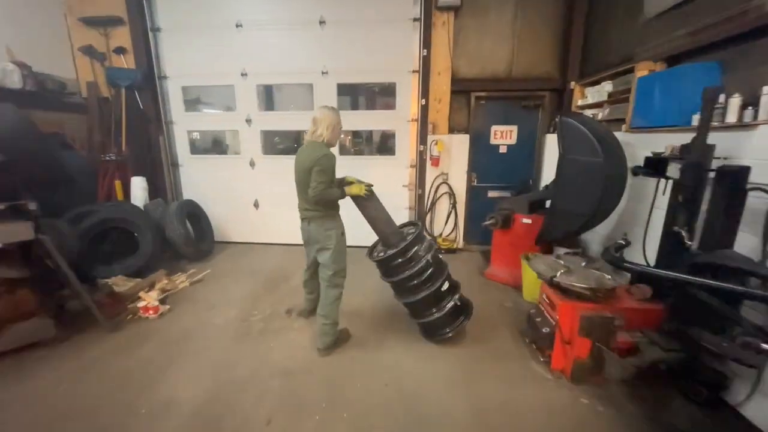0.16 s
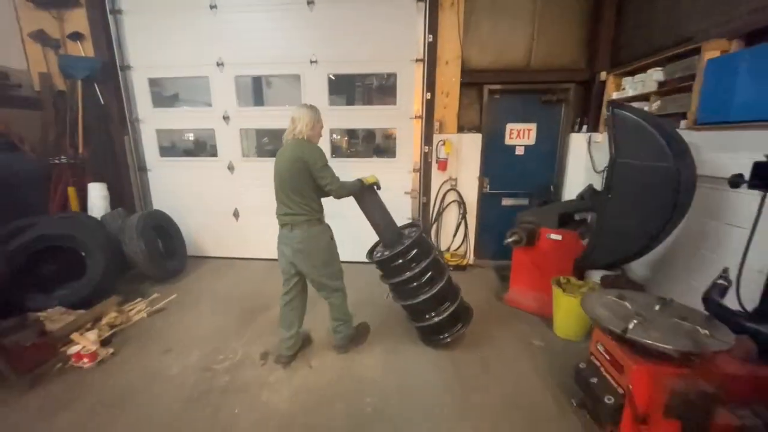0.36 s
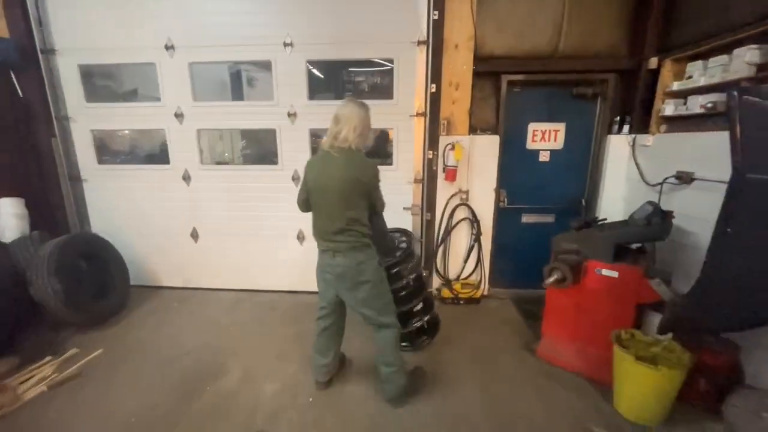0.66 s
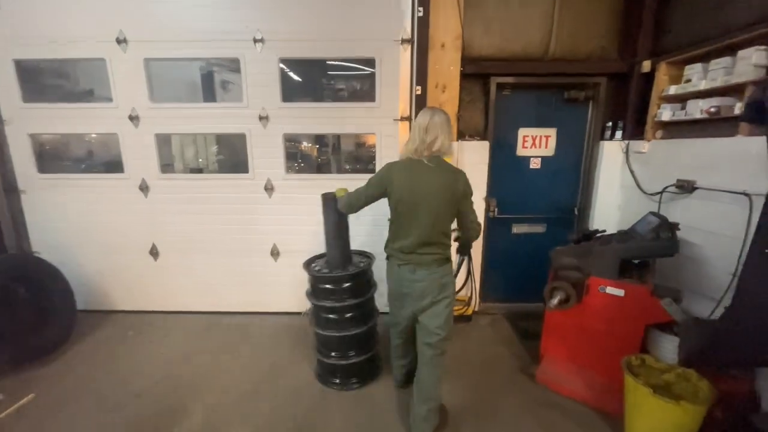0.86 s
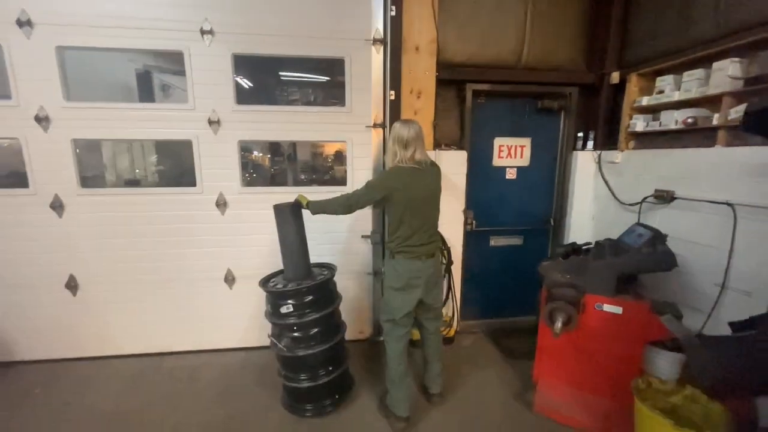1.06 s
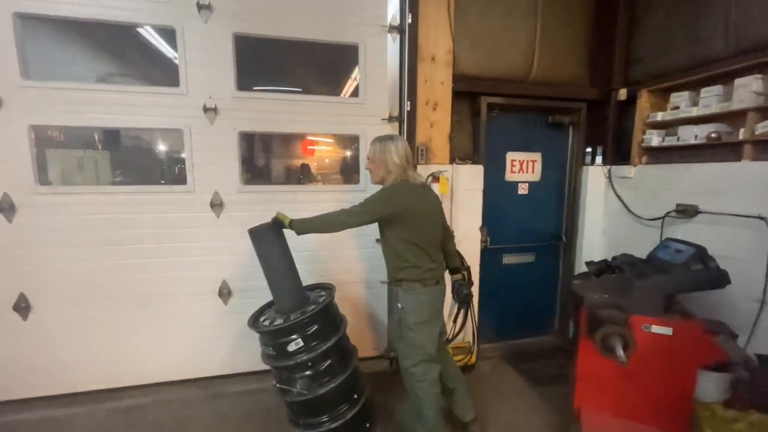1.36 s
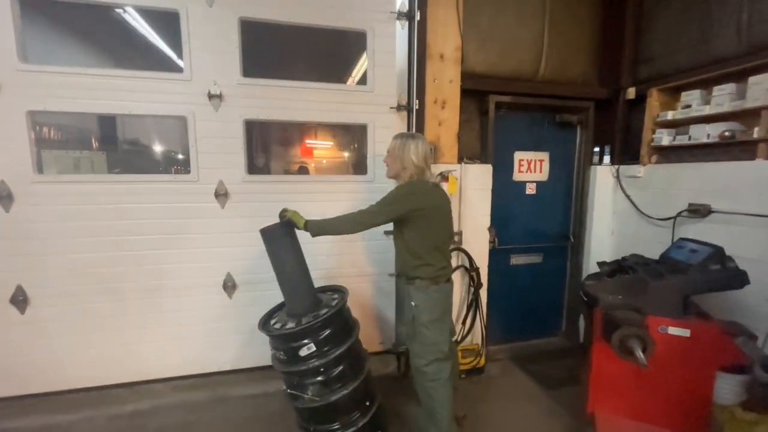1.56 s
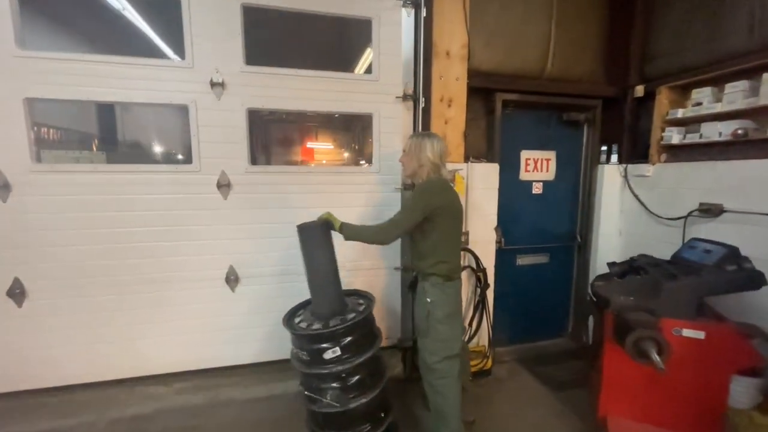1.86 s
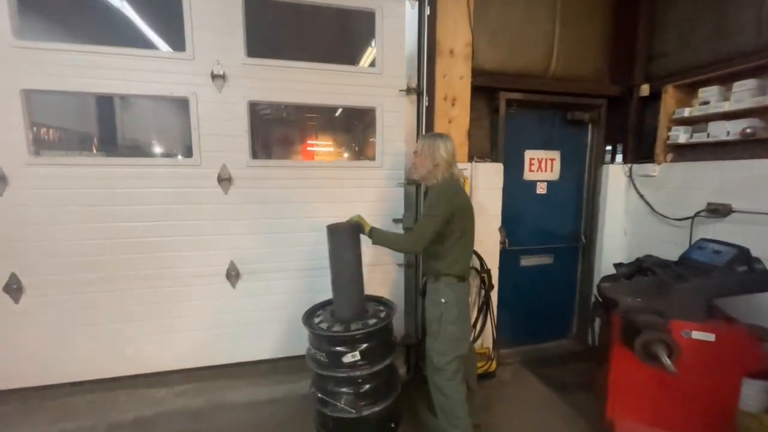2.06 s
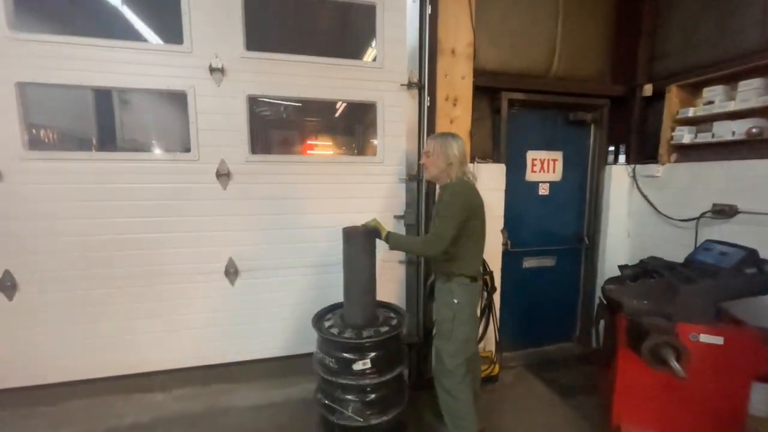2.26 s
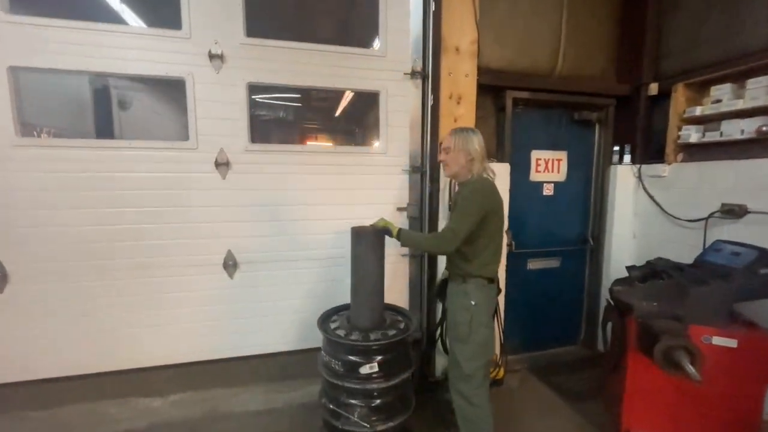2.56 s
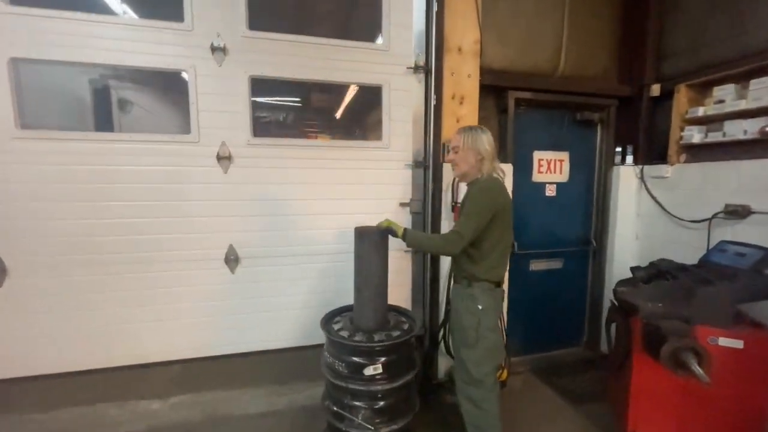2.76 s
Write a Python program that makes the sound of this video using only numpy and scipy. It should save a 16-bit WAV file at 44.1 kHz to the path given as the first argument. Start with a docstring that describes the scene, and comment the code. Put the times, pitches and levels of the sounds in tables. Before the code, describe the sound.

In a workshop, a steel stove is walked on its rim with gritty scrapes and a low rumble, then set down. An electric opener hums and its chain hisses until sheet metal door panels rattle hard. Mono, slightly dull top.

```python
"""Workshop: a heavy steel stove is walked on its rim over concrete: low rumble, gritty scuffs, a thud as it is set down.
Then a door opener starts with a clack, hums and jingles its chain; the sheet metal door jolts and rattles as it lifts.
Rumble, hum and boom are notes wandering in phase; scuffs, jolts and clack are bursts of gritty noise.
Scuffs and jolts also strike modes of steel; chance ticks ring the chain.
Lone tones, short bright noise bursts, mostly on top of scuffs and jolts, and a murmur complete it."""
import sys
import numpy as np
from scipy import signal
from scipy.fft import rfft, irfft
from scipy.io import wavfile
from scipy.ndimage import uniform_filter1d

SR = 44100
rng = np.random.default_rng(int(sys.argv[2]) if len(sys.argv) > 2 else 0)


def bounce(signal):
    """Save signal as a 16-bit WAV file at the path given by the first command-line argument."""
    frames = np.transpose(np.atleast_2d(signal))
    limited = np.clip(frames, -1, 1)
    pcm = np.round(limited * 32767).astype(np.int16)
    wavfile.write(sys.argv[1], SR, pcm)


N = 127890
CLACK_S = 1.208  # the opener starts


def rolling():
    """The rim drums the hollow body at a low note that slides as it leans."""
    # rumble: [t/s, level/dB, f/Hz]
    roll = [(0.015, -32, 136), (0.05, -50.5, 140.7), (0.132, -42, 129.5), (.3, -43, 145.8),
            (.36, -40.5, 103.3), (0.454, -47, 109), (0.482, -34, 125.2), (.545, -38, 149.3),
            (.575, -43.5, 144), (0.62, -34.5, 136.4), (0.67, -58, 123.5), (0.876, -64, 124.1),
            (0.916, -29.5, 118.5), (0.964, -47, 121.3), (1.2, -57, 108.6)]
    width_hz, fade_s = 28, roll[0][0]
    t = np.arange(N) / SR
    fade = np.clip(np.minimum(t, roll[-1][0] - t) / fade_s, 0, 1)
    note = wavering(curve(roll, column=2), width_hz, steady_s=0.0386)
    return amp(curve(roll, column=1)) * note * fade


def scuffs():
    """Rim and boots scuff and knock on concrete: gritty bursts that ring the steel body."""
    # scuffs and knocks: [start/s, level/dB, rise/s, t60/s, treble tilt/(dB/octave)]
    scuff_rows = [(0.0, -46.5, 0.0015, 1, -2.5), (.082, -41, 0.0055, 0.44, -1),
                  (.222, -48, 0.008, 0.8, -0.5), (.28, -45.5, 0.021, 1, -2), (.32, -32, 0.033, 0.16, 0),
                  (.436, -41, .012, 0.28, 0.5), (.468, -42, 0.015, 0.088, -0.5),
                  (.52, -41, 0.014, 0.25, 0.5), (.652, -49, 0.0052, 0.21, 7),
                  (.885, -26.5, 0.036, 0.18, 0.5), (1.0, -47, 0.03, 0.1, -2),
                  (1.045, -48, 0.0046, 0.074, 3.5)]
    # spectrum of the grit: [f/Hz, density/(dB per Hz)]
    grit = [(35, -42), (60, -25), (123, -6.5), (289, -12), (491, -8), (1080, -9.5), (1520, -11.5),
            (5180, -20.5), (10900, -29), (15000, -57)]
    # modes of the stove: [f/Hz, width/Hz, level/dB]
    stove_modes = [(228.8, 16, 5), (360, 26, 2), (488.7, 24, 6), (574, 17, -14), (872, 9.7, 3),
                   (1060, 12, -11), (1480, 11, -3), (1830, 5, -10), (2340, 13, -2), (2580, 12, -5),
                   (3210, 22, 1), (5470, 42, -8)]
    return blows(scuff_rows, grit, stove_modes, body_db=-6, spread_db=-1.5)


def jolts():
    """The door panels jolt: rattling bursts that ring the sheet metal."""
    # jolts: [start/s, level/dB, rise/s, t60/s, treble tilt/(dB/octave)]
    jolt_rows = [(2.382, -25.5, 0.0083, 1, 0), (2.42, -23, 0.015, 0.72, 0), (2.465, -26, 0.0062, 1, 1),
                 (2.51, -18.5, 0.012, 0.38, 0.5), (2.58, -31.5, 0.015, 0.43, -3.5),
                 (2.635, -26, 0.017, 0.81, -2), (2.745, -30, 0.006, 0.12, -3.5),
                 (2.8, -34.5, 0.017, 0.45, -1.5)]
    # spectrum of the rattle: [f/Hz, density/(dB per Hz)]
    rattle = [(35, -46), (60, -23), (112, -9), (317, -16.5), (577, -13.5), (633, -13), (938, -12.5),
              (5180, -24.5), (7330, -27.5), (10600, -29.5), (15000, -65)]
    # modes of the panels: [f/Hz, width/Hz, level/dB]
    panel_modes = [(254.7, 7.4, -2.5), (459.6, 6.9, -3), (510, 3.5, -6.5), (718, 4.5, -3.5),
                   (847, 4.3, -2.5), (1094, 8, -7.5), (1474, 7.6, -3), (1786, 7.4, -14), (2029, 5.6, -5),
                   (2269, 3.6, -6.5), (2580, 6.2, -11), (4790, 9.4, -6.5), (5120, 7.4, -6.5),
                   (10550, 100, -2.5)]
    return blows(jolt_rows, rattle, panel_modes, body_db=-2, spread_db=2)


def boom():
    """The whole door booms at its lowest note."""
    # boom: [t/s, level/dB]
    boom_level = [(2.38, -32), (2.472, -20), (2.6, -42.5), (2.656, -24.5), (2.708, -35.5), (2.846, -32),
                  (2.9, -36)]
    hz, width_hz, fade_in_s = 109.5, 7.2, 0.039
    fade = np.clip((np.arange(N) / SR - boom_level[0][0]) / fade_in_s, 0, 1)
    return amp(curve(boom_level, column=1)) * wavering(hz, width_hz, steady_s=0.14) * fade


def singing():
    """One part of the door sings a narrow note through the jolts."""
    # singing part: [t/s, level/dB]
    sing_level = [(2.4, -52), (2.44, -29), (2.6, -29.5), (2.72, -39.5), (2.78, -43)]
    hz, width_hz, fade_s = 628, 4.2, 0.017
    t = np.arange(N) / SR
    fade = np.clip(np.minimum(t - sing_level[0][0], sing_level[-1][0] - t) / fade_s, 0, 1)
    return amp(curve(sing_level, column=1)) * wavering(hz, width_hz, steady_s=0.022) * fade


def opener():
    """Motor, chain and gears each follow a level curve once the opener has started."""
    # opener running: [t/s, hum level/dB, chain level/dB]
    running = [(1.27, -40, -56), (1.39, -39, -47.5), (1.45, -35.5, -46.5), (1.51, -33, -39.5),
               (1.66, -34, -42), (1.8, -32.5, -39.5), (2.02, -34, -40.5), (2.37, -32.5, -42),
               (2.9, -41, -43)]
    # roar of the gears: [t/s, level/dB]
    roar_level = [(1.27, -42), (1.4, -47), (1.44, -46), (1.49, -41), (2.1, -42), (2.25, -43.5), (2.37, -41),
                  (2.9, -41)]
    spin_up_s = 0.05
    on = np.clip((np.arange(N) / SR - CLACK_S) / spin_up_s, 0, 1)
    hum = amp(curve(running, column=1)) * motor_hum()
    chain_and_whine = amp(curve(running, column=2)) * (chain() + whine())
    roar = amp(curve(roar_level, column=1)) * gear_roar()
    return on * (hum + chain_and_whine + roar)


def motor_hum():
    """The motor hums on several low notes, each wandering in phase."""
    # notes: [f/Hz, width/Hz, level/dB]
    hum_notes = [(72.6, 14, -4.5), (117.2, 6.6, 0.5), (146.5, 23, -6), (185, 40, -10), (49.8, 33, -19)]
    return evened(sum(amp(db) * wavering(hz, width, steady_s=0.15) for hz, width, db in hum_notes))


def gear_roar():
    """The gears roar: coloured noise, with resonances driven by the same noise."""
    # spectrum of the roar: [f/Hz, density/(dB per Hz)]
    roar_spectrum = [(25, -14), (123, -13), (313, -25), (391, -20.5), (665, -26.5), (1010, -33),
                     (1510, -32), (2870, -35), (4280, -45.5), (5000, -37), (6500, -77)]
    # resonances: [f/Hz, width/Hz, level/dB]
    roar_rings = [(383, 11, -17), (980, 200, -5), (2846, 12, -21)]
    noise = gritty(N, spread_db=0.5)
    high_pass = signal.butter(2, 200, "high", fs=SR)
    roar = evened(signal.lfilter(*high_pass, coloured(noise, roar_spectrum, lump_db=3.0)))
    return roar + sum(amp(db) * evened(resonate(noise, hz, width)) for hz, width, db in roar_rings)


def whine():
    """A thin high note of the gears fades in, then comes and goes."""
    hz, width_hz, level_db = 4540, 30, -14.5
    start_s, rise_s = 1.3, 0.2
    fade = np.clip((np.arange(N) / SR - start_s) / rise_s, 0, 1)
    return amp(level_db) * wavering(hz, width_hz, steady_s=0.053) * wander() * fade


def chain():
    """The chain hisses and jingles, and runs unevenly."""
    # spectrum of the hiss: [f/Hz, density/(dB per Hz)]
    hiss_spectrum = [(2060, -45), (3500, -4.5), (4270, -10), (5280, -3), (6320, -5), (8910, -3),
                     (10800, -4), (11600, 6), (13700, -45), (15500, -38)]
    links_db = 2  # re hiss
    hiss = evened(coloured(gritty(N, spread_db=2.5), hiss_spectrum, lump_db=5.5))
    return evened((hiss + amp(links_db) * chain_links()) * wander(depth_db=1, span_s=0.0079))


def chain_links():
    """Each link mode is ticked at random moments with chance strength."""
    # link modes: [f/Hz, width/Hz, level/dB]
    link_modes = [(5380, 100, -8), (7900, 83, -6), (8430, 45, -6), (9500, 73, -6), (10160, 140, 0),
                  (10730, 63, -1.5), (10780, 84, 1.5), (11100, 78, -5)]
    ticks_per_s, spread_db = 500, 2.5  # per mode
    count = round(ticks_per_s * N / SR)
    out, shake = np.zeros(N), wander()
    for hz, width, db in link_modes:
        when, size = rng.random((2, count))
        ticks = np.zeros(N)
        ticks[(when * N).astype(int)] = amp(-spread_db * np.log(np.maximum(size, 0.02)))
        out += amp(db) * resonate(ticks * shake, hz, width)
    return evened(out)


def clack():
    """The opener engages and settles: bright bursts over a thump whose low note climbs."""
    # clacks: [start/s, level/dB, rise/s, t60/s, treble tilt/(dB/octave)]
    clack_rows = [(1.21, -29, 0.024, 0.14, 0), (1.272, -39.5, 0.017, 0.29, -1.5)]
    # spectrum of the clacks: [f/Hz, density/(dB per Hz)]
    clack_spectrum = [(50, -24), (166, -8), (648, -17), (960, -23), (1630, -18), (2590, -19), (10900, -16),
                      (15000, -48)]
    thump_db, from_hz, to_hz = -32.5, 93, 208
    rise_s, t60_s, glide_s = 0.045, 0.16, 0.03
    out = blows(clack_rows, clack_spectrum, body=None, body_db=0, spread_db=0.64)
    t = np.arange(SR // 4) / SR
    hz = to_hz + (from_hz - to_hz) * np.exp(-t / glide_s)
    thump = swell(t, rise_s, t60_s) * np.sin(2 * np.pi * np.cumsum(hz) / SR)
    add(out, CLACK_S, amp(thump_db) * thump)
    return out


def pings():
    """Short lone tones swell and die."""
    # tones: [start/s, f/Hz, level/dB, rise/s, t60/s]
    ping_rows = [(.175, 507, -41.5, 0.02, 0.15), (.54, 650, -45.5, 0.017, 0.13),
                 (.95, 631, -36.5, 0.0062, 0.14), (1.029, 261.5, -47, 0.013, 0.24),
                 (1.15, 360, -53.5, 0.031, 0.11), (1.222, 654, -42.5, .018, 0.086)]
    out, t = np.zeros(N), np.arange(SR // 2) / SR
    for start, hz, db, rise, t60 in ping_rows:
        tone = np.sin(2 * np.pi * (hz * t + rng.random()))
        add(out, start, amp(db) * swell(t, rise, t60) * tone)
    return out


def bright_bursts():
    """Short bright noise, mostly on top of scuffs and jolts: gritty noise through two equal resonances in a row."""
    # bright band bursts: [start/s, level/dB, rise/s, t60/s, centre f/Hz, width of each resonance/Hz]
    burst_rows = [(.08, -43, 0.004, 0.076, 5160, 1500), (.436, -45, 0.025, 0.18, 3620, 2960),
                  (0.52, -49.5, 0.007, 0.27, 10500, 1800), (1.9, -42, 0.15, 0.97, 5270, 1810),
                  (2.039, -34, 0.0042, .09, 5440, 1400), (2.431, -27, 0.0076, 0.36, 5070, 1500),
                  (2.515, -28.5, 0.01, 0.14, 10720, 900), (2.745, -33.5, 0.01, 0.067, 4630, 1300)]
    out, t = np.zeros(N), np.arange(SR // 2) / SR
    for start, db, rise, t60, hz, width in burst_rows:
        band = resonate(resonate(gritty(len(t), spread_db=2.0), hz, width), hz, width)
        add(out, start, amp(db) * swell(t, rise, t60) * evened(band))
    return out


def murmur():
    """The room murmurs: coloured noise, higher while the stove moves."""
    # murmur: [t/s, level/dB]
    murmur_level = [(0, -56.5), (.6, -50.5), (.75, -54), (.88, -45), (1.05, -54), (1.08, -55.5),
                    (2.9, -57.5)]
    # spectrum of the room: [f/Hz, density/(dB per Hz)]
    room_spectrum = [(15, -32), (25, -5), (81, 5.5), (286, -12.5), (1180, -16.5), (1960, -20), (3930, -25),
                     (10600, -24), (15000, -48)]
    return amp(curve(murmur_level, column=1)) * evened(coloured(rng.standard_normal(N), room_spectrum))


def blows(table, spectrum, body, body_db, spread_db):
    """Each blow is a gritty burst that swells and dies, and strikes every mode of any body with a chance strength."""
    out, t = np.zeros(N), np.arange(SR // 2) / SR
    for start, db, rise, t60, tilt_db in table:
        noise = coloured(gritty(len(t), spread_db), spectrum, tilt_db, lump_db=3)
        sound = evened(noise) * swell(t, rise, t60)
        if body:
            f, width, mode_db = np.transpose(body)[:, :, None]
            phase, chance = rng.random((2, len(body), 1))
            strength = amp(mode_db + tilt_db * np.log2(f / 1000) + 8 * (chance - 0.5))
            decay = swell(t, rise, 2.2 / width)  # t60 = 2.2 / width
            ring = (strength * decay * np.sin(2 * np.pi * (f * t + phase))).sum(0)
            sound = sound + amp(body_db) * ring / np.sqrt((strength ** 2).sum() / 2)
        add(out, start, amp(db) * sound)
    return out


def wavering(hz, width, steady_s):
    """A note, fixed or gliding, that wanders in phase while its strength, averaged over steady_s, holds."""
    slow = rng.standard_normal(N) + 1j * rng.standard_normal(N)
    for r in np.exp(-np.pi * width * np.array([1, 2]) / SR):
        slow = signal.lfilter([1 - r], [1, -r], slow)
    note = (slow * np.exp(2j * np.pi * np.cumsum(hz * np.ones(N)) / SR)).real
    power = abs(uniform_filter1d(note ** 2, round(steady_s * SR)))
    return note / np.sqrt(power + 1e-9)


def gritty(count, spread_db):
    """Noise whose strength jumps every few milliseconds."""
    jumps = evened(uniform_filter1d(rng.standard_normal(count), size=130))
    return amp(spread_db * jumps) * rng.standard_normal(count)


def coloured(x, spectrum, tilt_db=0, lump_db=0):
    """Gives x a spectrum, tilted about 1 kHz and lumpy with many small chance resonances."""
    lump_hz = 29.94
    hz = np.fft.rfftfreq(len(x), 1 / SR) + 1  # + 1 keeps the log finite
    f, db = np.transpose(spectrum)
    tilt = tilt_db * np.log2(np.maximum(hz, 150) / 1000)
    gain = amp(np.interp(np.log(hz), np.log(f), db) + tilt)
    lumps = np.interp(hz / lump_hz, np.arange(len(hz)), rng.standard_normal(len(hz)))
    return irfft(rfft(x) * gain * amp(lump_db * lumps), len(x))


def resonate(x, hz, width):
    """A one-pole complex resonance of gain about 1 at hz."""
    r = np.exp(-np.pi * width / SR)
    return 2 * signal.lfilter([1 - r], [1, -r * np.exp(2j * np.pi * hz / SR)], x).real


def wander(depth_db=2.5, span_s=0.02):
    """A gain that drifts up and down by chance."""
    span = round(span_s * SR)
    drift = uniform_filter1d(uniform_filter1d(rng.standard_normal(N), span), span)
    return amp(depth_db * evened(drift))


def swell(t, rise, t60):
    """A smooth rise, then an exponential decay of 60 dB per t60."""
    return np.sin(np.pi / 2 * np.clip(t / rise, 0, 1)) ** 2 * amp(-60 * np.maximum(t - rise, 0) / t60)


def curve(table, column):
    """One column of a table, interpolated over the whole scene."""
    rows = np.array(table)
    return np.interp(np.arange(N) / SR, rows[:, 0], rows[:, column])


def add(mix, start_s, sound):
    """Adds sound to mix in place, cut at the end of mix."""
    part = mix[round(start_s * SR):][:len(sound)]
    part += sound[:len(part)]


def evened(x):
    """Scales x to an RMS of 1."""
    return x / np.sqrt(np.mean(x ** 2) + 1e-20)


def amp(db):
    """Amplitude of a level in dB."""
    return 10 ** (np.asarray(db) / 20)


def scene():
    """Stove, door, opener, small sounds and room in one channel."""
    stove = rolling() + scuffs()
    door = jolts() + boom() + singing()
    small_sounds = pings() + bright_bursts()
    return (stove + door + opener() + clack() + small_sounds + murmur())[None]


def record(dry):
    """The microphone falls off in the top octave; then a steep band limit."""
    roll_off_hz, edge_hz = 14500, 15650
    dull = signal.sosfilt(signal.butter(4, roll_off_hz, fs=SR, output="sos"), dry)
    band_limit = signal.firwin(511, edge_hz, window=("kaiser", 9), fs=SR)
    return signal.oaconvolve(dull, band_limit[None], "same")


dry = scene()
out = record(dry)
bounce(out)
```